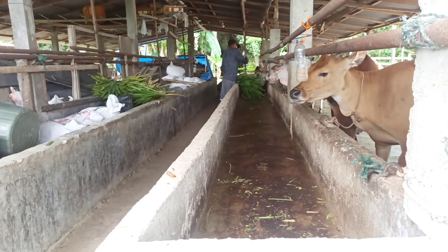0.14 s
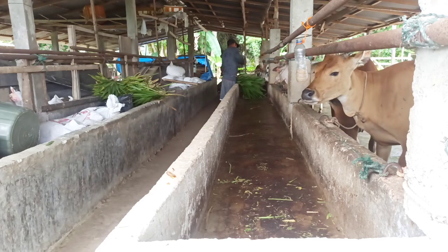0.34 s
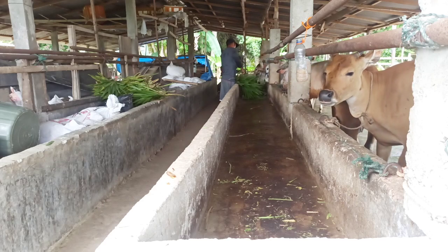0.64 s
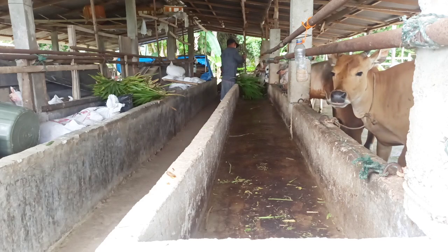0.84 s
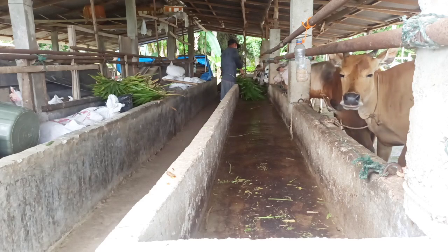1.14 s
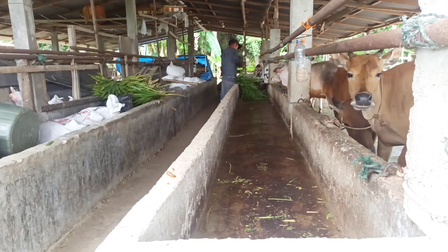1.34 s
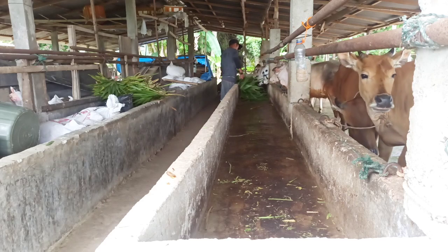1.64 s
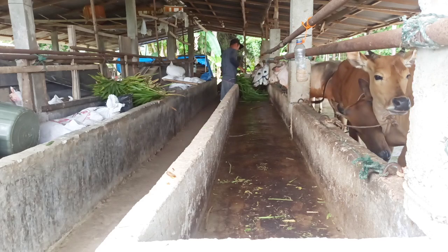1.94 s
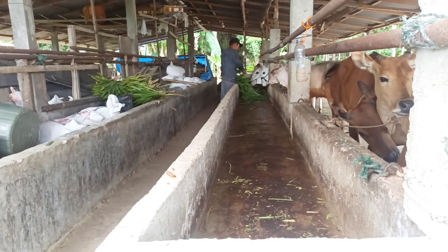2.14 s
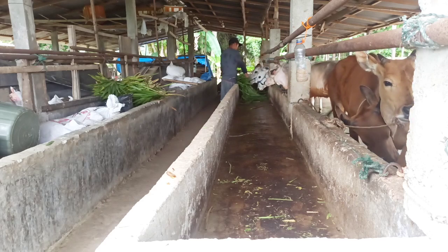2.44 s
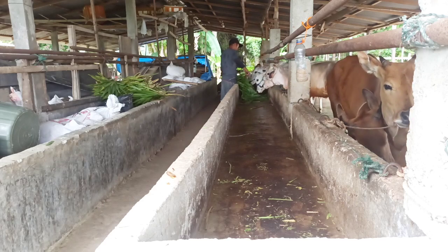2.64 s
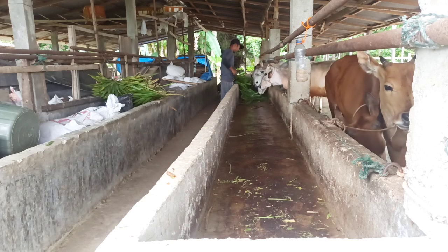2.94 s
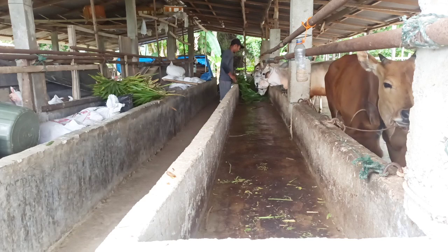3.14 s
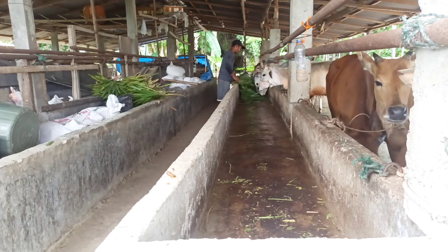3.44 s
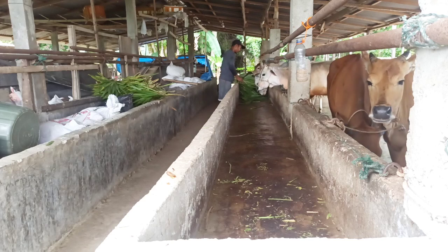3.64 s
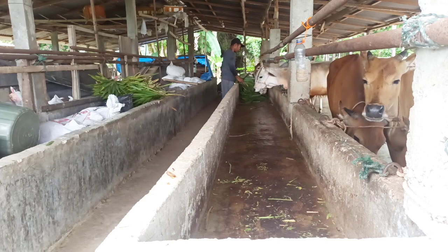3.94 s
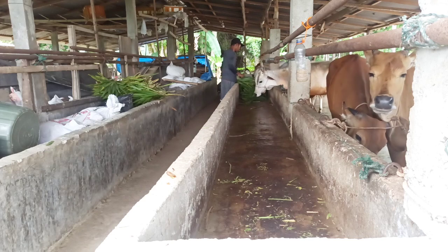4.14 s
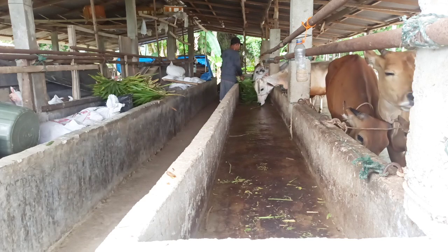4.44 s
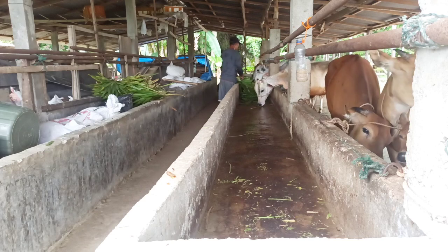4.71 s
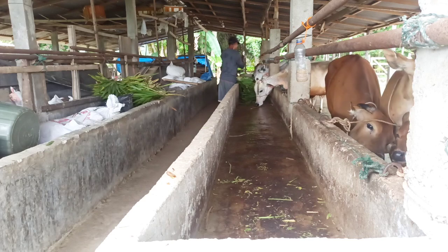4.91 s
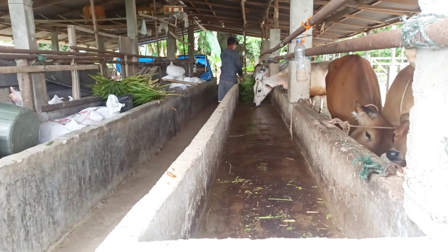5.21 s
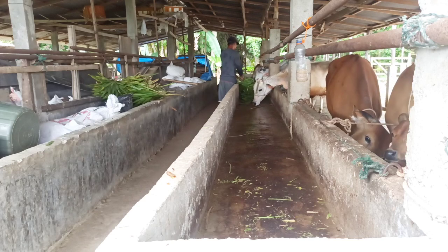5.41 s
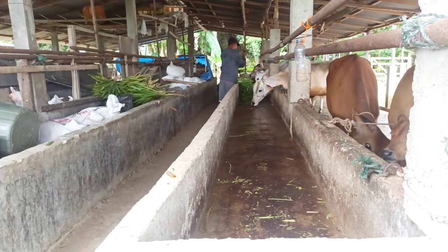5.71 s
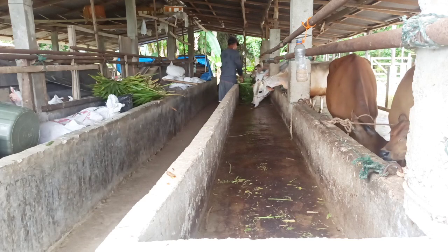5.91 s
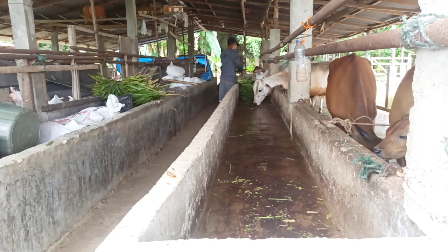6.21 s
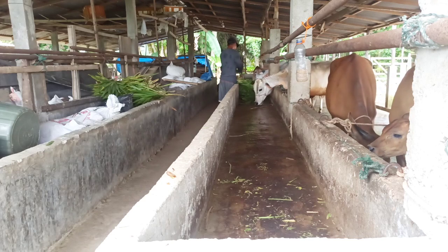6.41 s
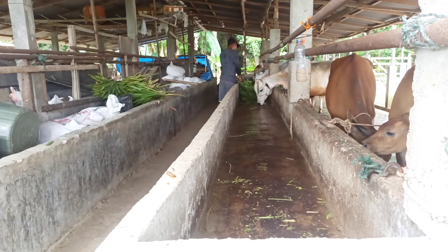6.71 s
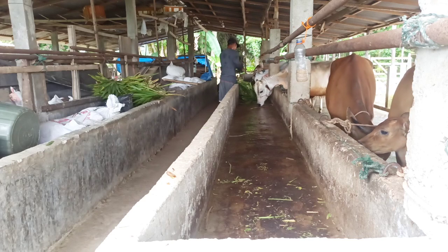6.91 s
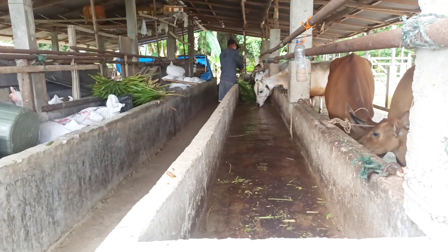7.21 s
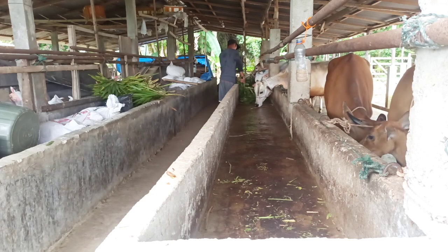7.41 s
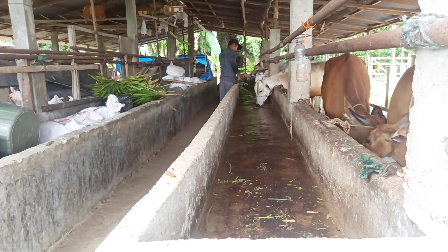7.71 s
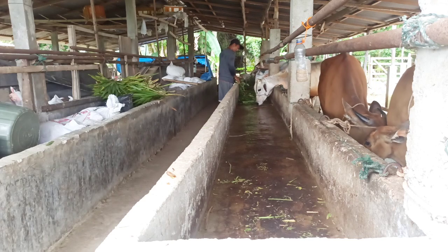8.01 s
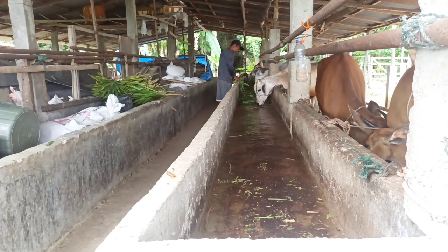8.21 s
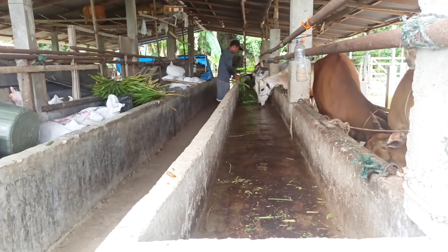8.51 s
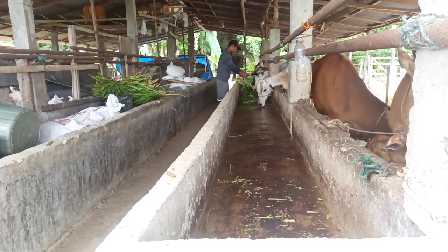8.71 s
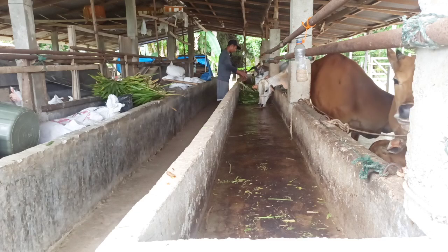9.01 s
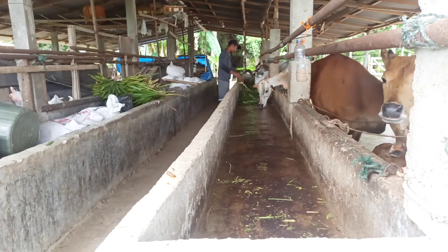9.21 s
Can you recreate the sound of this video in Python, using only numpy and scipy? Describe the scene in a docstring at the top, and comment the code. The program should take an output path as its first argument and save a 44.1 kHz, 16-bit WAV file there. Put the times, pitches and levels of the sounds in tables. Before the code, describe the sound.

Irregular chops through stalks on a wooden block, with cattle shuffling, buzzing insects and bird chirps over a low engine rumble.

```python
"""A worker chops fodder grass down the aisle of an open cattle barn: each blow knocks on the wooden
block and crunches through the stalks. Cattle shuffle in the litter and scrape against concrete and
rails, leaves rustle, insects rasp their wings and a small bird chirps under the roof.
A low, uneven throb, like a slow one-cylinder engine far away, comes and goes in spells over the
rumble of the farm. The whole scene sits a little to the right."""
import sys
import numpy as np
from scipy import signal
from scipy.fft import rfft, irfft, next_fast_len
from scipy.io import wavfile
from scipy.ndimage import map_coordinates

SR = 44100
rng = np.random.default_rng(int(sys.argv[2]) if len(sys.argv) > 2 else 0)


def wav_record(signal):
    """Record a signal, one row per channel, as 16-bit PCM in the file named by sys.argv[1]."""
    frames = np.transpose(np.atleast_2d(signal))
    bounded = np.clip(frames, -1, 1)
    # unit amplitude maps onto the largest positive 16-bit level
    quanta = np.round(bounded * 32767).astype(np.int16)
    wavfile.write(sys.argv[1], SR, quanta)


N = 412335

# Blows of the blade. Each row: start in seconds, length of the cut in seconds, knock level in dB,
# pitch of the block in Hz, crunch level in dB.
BLOWS = [(.49, 0.0032, -8.5, 997, -16), (1.098, 0.015, -11, 647, -16.5), (1.629, 0.022, -15, 820, -15.5),
         (2.425, 0.057, -15, 1105, -21), (4.503, 0.026, -27.5, 1180, -25), (5.235, 0.013, -10, 1074, -18),
         (5.92, 0.012, -11, 1606, -16.5), (6.224, 0.01, -40, 904, -29), (6.563, 0.019, -14.5, 750, -17.5),
         (7.325, 0.011, -14.5, 1460, -14), (7.735, 0.014, -32, 795, -30), (7.824, 0.0054, -27.5, 837, -41),
         (7.836, 0.004, -22, 1690, -28), (9.044, 0.054, -23.5, 910, -31.5)]
# The block's short ring. Each row: multiple of its pitch, relative level in dB, t60 in seconds.
BLOCK_MODES = [(.4, -4.5, 0.065), (.6, -12, 0.034), (.78, -11, 0.032), (1, 2.5, 0.053), (1.21, -3, 0.065),
               (1.85, -18, 0.014)]
# Tone of the dull knock and the bright crunch. Each row: frequency in Hz, relative level in dB.
KNOCK_TONE = [(90, -10), (200, 2), (380, 2), (680, 0.5), (980, 2), (1300, -1), (2000, -2.5), (3200, -15.5),
              (6000, -23.5), (16000, -69)]
CRUNCH_TONE = [(150, -38), (400, -9.5), (800, -6.5), (1500, 0), (3000, 1), (4500, 5.5), (7000, 0.5),
               (8500, 0.5), (12000, -9), (16000, -11.5)]

def chopping(ring_db=1, ring_attack_s=0.0015, crunch_lag_s=0.00015):
    """The blade knocks, fibres snap and the wooden block rings; knock and crunch leave a noisy tail."""
    t = np.arange(SR * 3 // 4) / SR
    knocks, crunches, rings = np.zeros((3, N))
    for s, length, knock_db, pitch, crunch_db in BLOWS:
        strikes = rng.uniform((-2, 0), (2, 1), (len(BLOCK_MODES), 2))  # each mode's dB offset and phase
        ring = sum(amp(db + vary - 60 * t / t60) * np.sin(2 * np.pi * (ratio * pitch * t + phase))
                   for (ratio, db, t60), (vary, phase) in zip(BLOCK_MODES, strikes))
        add(rings, s, amp(knock_db + ring_db) * (1 - np.exp(-t / ring_attack_s)) * ring)
        knock = cut(t, length, attack_s=0.00068, drop_t60=0.016, tail_db=-4, tail_t60=0.38, sag_db=5)
        crunch = cut(t, length, attack_s=0.002, drop_t60=0.073, tail_db=3.5, tail_t60=0.46, sag_db=0)
        add(knocks, s, amp(knock_db) * knock)
        add(crunches, s + crunch_lag_s, amp(crunch_db) * crunch)
    return rings + knocks * noise(KNOCK_TONE, grain_db=-1.5) + crunches * noise(CRUNCH_TONE, grain_db=1)

def cut(t, length, attack_s, drop_t60, tail_db, tail_t60, sag_db):
    """Envelope of a cut: it holds or sags while the blade passes, then falls to a lingering tail."""
    after = np.maximum(t - length, 0)
    direct = amp(-sag_db * np.minimum(t / length, 1) - 60 * after / drop_t60)
    tail = amp(tail_db - 60 * after / tail_t60)
    return (1 - np.exp(-t / attack_s)) * np.hypot(direct, tail)

# Moves in the litter and grass. Each row: start, rise, hold and fall in seconds, shuffle level in dB,
# rustle level in dB.
MOVES = [(0.0, 0.0067, 0.051, 0.39, -31, -31.5), (0.562, 0.024, 0.19, 0.75, -33, -33),
         (1.147, 0.083, 0.29, .25, -31, -31.5), (1.728, 0.13, 0.05, 0.24, -30, -27),
         (2.396, 0.028, 0.21, 0.48, -28.5, -31), (3.063, 0.055, 1, 0.36, -35, -32.5),
         (3.395, 0.32, 0.033, 0.23, -24.5, -26), (4.25, 0.092, .3, 0.5, -33.5, -39.5),
         (5.497, 0.2, 0.39, 0.49, -34, -35.5), (6.347, 0.16, 0.46, 0.34, -37, -35.5),
         (7.39, 0.056, 0.34, .12, -30, -30), (8.044, 0.11, 1, .4, -33, -33),
         (8.971, 0.061, 0.024, 0.31, -28, -28.5)]
# Tone of the soft litter and the crisp leaves. Each row: frequency in Hz, relative level in dB.
LITTER_TONE = [(120, -24), (280, 1.5), (450, -0.5), (850, -0.5), (1500, -2), (2500, -3.5), (4000, -3.5),
               (9000, -25)]
LEAF_TONE = [(800, -32), (2000, -14), (3500, -5), (5500, 4), (7200, 2.5), (8500, 2.5), (12000, -7),
             (16000, -9.5)]

def stirring(litter_bed_db=-35, leaf_bed_db=-40.5, clump_db=1.5):
    """Hooves and muzzles push through litter and grass rustles; each move rises out of a steady bed."""
    shuffle, rustle = amp(litter_bed_db), amp(leaf_bed_db)
    for s, rise, hold, fall, shuffle_db, rustle_db in MOVES:
        move = swell(s, rise, hold, fall)
        shuffle = np.hypot(shuffle, amp(shuffle_db) * move)
        rustle = np.hypot(rustle, amp(rustle_db) * move)
    clumps = amp(clump_db * wobble(35))
    litter = shuffle * clumps * noise(LITTER_TONE, grain_db=0.5)
    leaves = rustle * clumps * noise(LEAF_TONE, grain_db=1)
    return litter + leaves * amp([[.4], [-.4]])  # leaves a touch louder on the left

# Hoof and horn scrapes. Each row: start in seconds, length in seconds, pitch in Hz, relative level in dB.
RUBS = [(1.03, 0.028, 513, -34), (2.19, 0.027, 392, -31), (3.85, .032, 715, -31.5),
        (4.245, 0.087, 1080, -33), (4.25, 0.066, 2060, -31), (4.42, 0.28, 1450, -35),
        (8.3, 0.094, 1030, -38), (9.05, .052, 353, -28), (9.275, .038, 332, -29.5)]

def scraping(dry_db=1.5, wet_db=-4):
    """Hooves and horns rub briefly against concrete and rails."""
    rubs = bursts(RUBS, width_hz=750)
    return amp(dry_db) * rubs + amp(wet_db) * barn_reverb(rubs)

# The insect chorus swells and eases. Each row: time in seconds, level in dB.
CHORUS_LEVEL = [(0, -33), (2.6, -34), (3.7, -31), (4.9, -30.5), (5.9, -31), (7.9, -33), (8.7, -30),
                (9.35, -31.5)]
# Near insects calling. Each row: start in seconds, length in seconds, pitch in Hz, relative level in dB.
INSECT_CALLS = [(.7, 0.36, 4650, -27.5), (3.09, 0.074, 6800, -36), (3.11, 0.27, 4480, -25),
                (3.52, 0.36, 4520, -27.5), (4.18, 0.26, 4510, -25), (5.43, 0.21, 4650, -30),
                (5.68, 0.19, 6870, -37), (6.42, .15, 6820, -37), (6.76, 0.23, 4536, -31),
                (6.88, 0.66, 6690, -36), (7.7, 0.26, 4450, -30.5), (8.06, 0.25, 4420, -27.5),
                (8.41, 0.16, 4510, -28)]
# Tone of the chorus and the thin sheen above it. Each row: frequency in Hz, relative level in dB.
CHORUS_TONE = [(2500, -40), (3600, -12.5), (4150, -4.5), (4550, -1), (4730, -0.5), (4950, -21),
               (6000, -41.5)]
SHEEN_TONE = [(4600, -33), (5000, 10.5), (5400, 7), (5900, 1.5), (6700, -8), (7400, -4.5), (8500, -36)]

def insects(usual_chorus_db=-34, usual_sheen_db=-38, sheen_growth=1.77, dry_db=-5, wet_db=-2):
    """Many wings rasp in one flickering band, under a sheen that grows with them; near ones call out."""
    chorus_db = curves(CHORUS_LEVEL)[0]
    sheen_db = usual_sheen_db + sheen_growth * (chorus_db - usual_chorus_db)
    chorus = amp(chorus_db + 1.64 * wobble(30)) * noise(CHORUS_TONE, grain_db=1.5)
    sheen = amp(sheen_db + 1.8 * wobble(30)) * noise(SHEEN_TONE, grain_db=1)
    calls = bursts(INSECT_CALLS, width_hz=540)
    return chorus + sheen + amp(dry_db) * calls + amp(wet_db) * barn_reverb(calls)

# The bird's notes. Each row: start in seconds, length in seconds, middle pitch in Hz,
# glide from start to end in Hz, relative level in dB.
BIRD_NOTES = [(.695, .05, 3070, -400, -41), (0.782, 0.081, 2750, -160, -39),
              (2.034, 0.062, 3020, -900, -38), (2.193, 0.042, 4230, 848, -31),
              (2.28, 0.093, 3550, -700, -33), (2.323, 0.044, 4420, -60, -32),
              (2.85, 0.077, 2970, -1100, -35.5), (4.84, 0.042, 2950, -1200, -34),
              (4.916, .066, 3040, -600, -24), (5.001, 0.043, 2870, -650, -26),
              (5.314, .048, 3100, -500, -29), (5.394, 0.041, 3000, -900, -31),
              (8.73, 0.04, 3190, -1300, -33), (8.797, 0.048, 3400, 170, -33),
              (8.836, .046, 2950, -750, -29), (8.903, 0.046, 2920, -600, -28)]

def bird(arch_hz=260, rasp_db=2.5, dry_db=-1.5, wet_db=-4.5):
    """Short, hoarse, arched notes that mostly fall away, echoing under the roof."""
    song = np.zeros(N)
    flutter = 1 + .028 * wobble(600)
    for s, length, middle_hz, glide_hz, db in BIRD_NOTES:
        u = np.linspace(0, 1, int(length * SR))  # progress through the note
        contour = middle_hz + glide_hz * (u - .5) - arch_hz * (2 * u - 1) ** 2
        hz = contour * flutter[int(s * SR):][:len(u)]
        envelope = np.sqrt(8 * u * (1 - u))
        add(song, s, amp(db) * envelope * np.sin(2 * np.pi * np.cumsum(hz) / SR))
    song *= amp(rasp_db * wobble(200))
    return amp(dry_db) * song + amp(wet_db) * barn_reverb(song)

# Pace of the far engine. Each row: time in seconds, firings per second.
FIRING_RATE = [(0, 16.72), (1.5, 17.64), (1.64, 20.2), (2.92, 19.24), (3.07, 17.52), (4.12, 19.2),
               (4.54, 22.94), (5.76, 23.21), (6.97, 21.75), (7.85, 22.59), (8.83, 20.89), (9.35, 17.51)]

def engine(rise_s=0.0043, lead_s=0.0021, jitter_s=0.0005, scatter_db=1.2, drone=0.076,
           octave_db=-19, wet_db=-17, level_db=-2, sink_db=-30):
    """A low boom, pumped once per uneven firing; reverb smears the throbs together."""
    strength, boom_hz = spells()
    turns = np.cumsum(curves(FIRING_RATE)[0]) / SR
    firings = np.flatnonzero(np.diff(np.floor(turns))) / SR
    t, throb = np.arange(SR // 10) / SR, np.zeros(N)
    puff = (t / rise_s) ** 2 * np.exp(-t / rise_s)
    for s, (size, late) in zip(firings, rng.standard_normal((300, 2))):
        add(throb, s - lead_s + jitter_s * late, amp(scatter_db * size) * puff)
    phase = 2 * np.pi * np.cumsum(boom_hz) / SR + 0.36 * wobble(45)
    booms = unit((drone + throb) * (np.cos(phase) + amp(octave_db) * np.cos(2 * phase)))
    echo = unit(spread(barn_reverb(booms)))
    presence = 1 / (1 + (amp(sink_db) / strength) ** 2)  # between spells it sinks into the rumble
    return amp(level_db) * strength * presence * unit(booms + amp(wet_db) * echo)

# Spells of throbbing. Each row: start in seconds, length in seconds, first and last relative level in dB,
# fade in seconds, boom pitch in Hz, glide in Hz per second.
THROB_SPELLS = [(0.0, .37, -21.5, -28, .07, 128, 0), (.76, 0.12, -26, -22, 0.11, 130, 0),
                (1.27, 0.39, -23.5, -22.5, 0.11, 131, 25), (1.72, 1.04, -24.5, -17.5, 0.071, 157, 4),
                (3.04, 1.34, -18, -23, .15, 148, -10), (4.3, 0.67, -26.5, -21.5, 0.048, 141.8, 5),
                (5.37, 1.23, -23.5, -20.5, 0.12, 150, -15), (6.69, 0.57, -19, -18.5, 0.1, 129, 2),
                (7.58, 1.05, -21, -16.3, 0.377, 157, -29)]

def spells(attack_s=0.087, idle_db=-30.5):
    """Strength and pitch of the throb: each spell sets in fast, drifts, and fades to idling."""
    t = np.arange(N) / SR
    strength = np.full(N, amp(idle_db))
    boom_hz = np.full(N, float(THROB_SPELLS[0][5]))
    for s, length, first_db, last_db, fade, hz, glide in THROB_SPELLS:
        age = np.clip(t - s, 0, length + fade)
        drift = amp(np.interp(age, [0, length], [first_db, last_db]))
        strength = np.maximum(strength, drift * swell(s, attack_s, length - attack_s, fade))
        boom_hz = np.where(t >= s, hz + glide * age, boom_hz)
    return strength, boom_hz

# Slow rise and fall of the farm's rumble. Each row: time in seconds, level in dB.
RUMBLE_LEVEL = [(0, -25), (1.1, -29.5), (2.1, -23), (2.75, -26.5), (3.3, -27.5), (4.7, -26), (6.4, -25),
                (7.3, -27.5), (7.95, -23), (9.35, -26.5)]
# Its bass-heavy tone. Each row: frequency in Hz, relative level in dB.
RUMBLE_TONE = [(20, -31), (38, -33), (50, -12), (64, 0.5), (95, 0), (150, 4), (200, -1.5), (260, -7),
               (310, -12), (600, -20.5), (2000, -41)]

def rumble(waver_db=0.95):
    """The low bed of the farm, wavering at random."""
    return amp(curves(RUMBLE_LEVEL)[0] + waver_db * wobble(6.8)) * noise(RUMBLE_TONE)

# Decay under the roof. Each row: frequency in Hz, t60 in seconds.
BARN_DECAY = [(200, 0.49), (1000, .42), (4000, 0.32), (8000, 0.36), (15000, 0.16)]

def barn_reverb(x):
    """The diffuse stereo answer of roof and walls to a mono sound."""
    hz, t, spectra = signal.stft(rng.standard_normal((2, SR // 2)), SR, nperseg=256)
    decay = amp(-60 * t / along(BARN_DECAY, hz)[:, None])
    tail = signal.istft(spectra * decay, SR, nperseg=256)[1]
    return signal.fftconvolve(x[None], tail / np.linalg.norm(tail[0]), axes=1)[:, :N]

# Stereo image of the barn. Each row: frequency in Hz, coherence between left and right.
COHERENCE = [(100, 0.92), (280, 0.77), (550, 0.73), (1100, 0.38), (2200, 0.25), (4500, .08), (8000, -0.22),
             (14000, 0.18)]

def spread(pair):
    """Turn two unrelated signals into left and right: narrow in the bass, wide in the treble."""
    angle = lambda hz: np.arccos(np.clip(along(COHERENCE, hz), -1, 1)) / 2
    mid, side = filtered(pair, lambda hz: np.array([np.cos(angle(hz)), np.sin(angle(hz))]))
    return np.array([mid + side, mid - side])

def noise(tone, grain_db=0):
    """Coloured stereo noise of rms 1; grain_db roughens it with millisecond crackles."""
    grainy = amp(grain_db * wobble(700)) * rng.standard_normal((2, N))
    return unit(spread(filtered(grainy, lambda hz: amp(along(tone, hz)))))

def bursts(rows, width_hz):
    """A track of narrow-band noise swells, each capped at half a second."""
    track, t = np.zeros(N), np.arange(SR // 2) / SR
    for s, length, hz, db in rows:
        envelope = np.sqrt(np.abs(np.hanning(min(int(length * SR), len(t)))))
        a, b = (map_coordinates(row, [t * width_hz]) for row in rng.standard_normal((2, 1024)))
        band = a * np.cos(2 * np.pi * hz * t) + b * np.sin(2 * np.pi * hz * t)
        add(track, s, amp(db) * envelope * band[:len(envelope)])
    return track

def swell(s, rise, hold, fall):
    """Envelope from 0 to 1 that starts at s, rises, holds and falls."""
    return np.interp(np.arange(N) / SR, s + np.cumsum(np.abs([0, rise, hold, fall])), [0, 1, 1, 0])

def amp(db):
    """Decibels to gain."""
    return 10 ** (np.asarray(db) / 20)

def unit(x):
    """Scale to rms 1."""
    return x / np.sqrt(np.mean(x ** 2) + 1e-20)

def along(points, hz):
    """Read (Hz, value) points on a log axis."""
    freqs, values = np.transpose(points)
    return np.interp(np.log(hz + 1), np.log(freqs + 1), values)

def curves(rows):
    """One value per sample for each column after the time."""
    times, *columns = np.transpose(rows)
    return [np.interp(np.arange(N) / SR, times, column) for column in columns]

def wobble(rate):
    """A smooth random curve, rate knots a second."""
    return map_coordinates(rng.standard_normal(int(N * rate / SR) + 4), [np.arange(N) * rate / SR])

def filtered(x, response):
    """Shape x with a response given as a function of Hz."""
    size = next_fast_len(N + 8192)
    return irfft(rfft(x, size) * response(np.fft.rfftfreq(size, 1 / SR)), size)[..., :N]

def add(track, s, sound):
    """Mix a sound into a track at s seconds."""
    part = track[..., max(0, round(s * SR)):]
    part = part[..., :sound.shape[-1]]
    part += sound[..., :part.shape[-1]]

def scene(left_db=0.16, left_lag_s=1.3 / SR):
    """The mix from the end of the feeding aisle; the left side is a hair later and louder."""
    left, right = engine() + rumble() + chopping() + stirring() + scraping() + insects() + bird()
    delay = lambda hz: np.exp(-2j * np.pi * hz * left_lag_s)
    return np.array([amp(left_db) * filtered(left, delay), right])

# Uneven treble with a deep notch from about 9 to 11.5 kHz. Each row: frequency in Hz, gain in dB.
TREBLE_EQ = [(4700, 0), (4950, -6.5), (6050, -2), (6300, 6), (7500, 5), (8450, 0), (8800, -12),
             (10000, -23.5), (11350, -42.5), (11650, 1.5), (15800, 3)]

def record(dry):
    """Master chain: uneven treble, a soft ceiling at full scale and a steep high cut."""
    coloured = filtered(dry, lambda hz: amp(along(TREBLE_EQ, hz)))
    limited = coloured / (1 + coloured ** 8) ** (1 / 8)
    return filtered(limited, lambda hz: hz < 15950)

dry = scene()
out = record(dry)
wav_record(out)
```